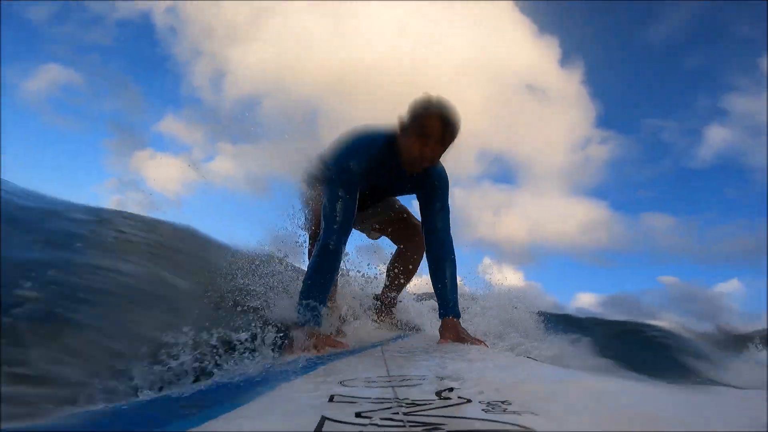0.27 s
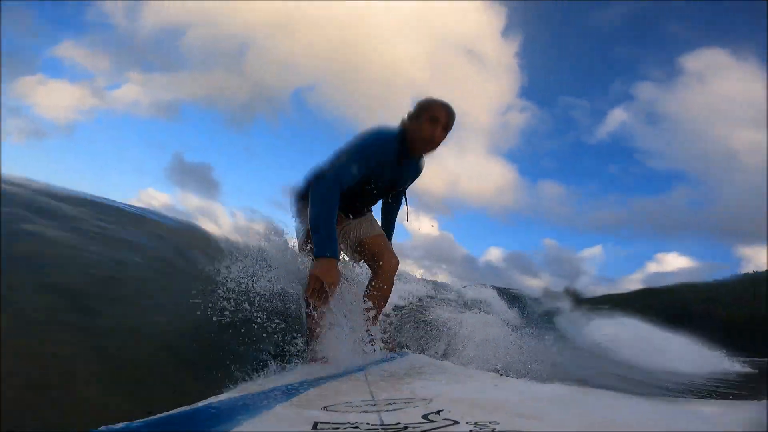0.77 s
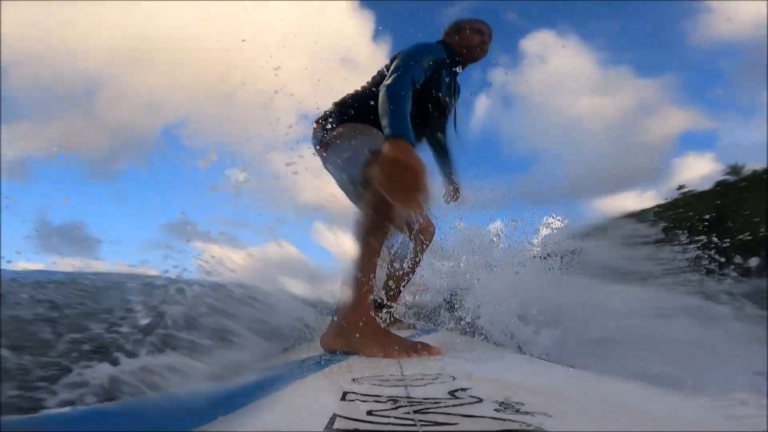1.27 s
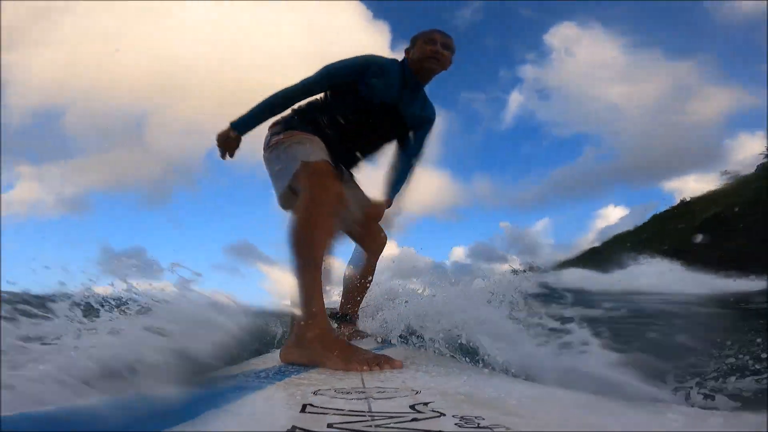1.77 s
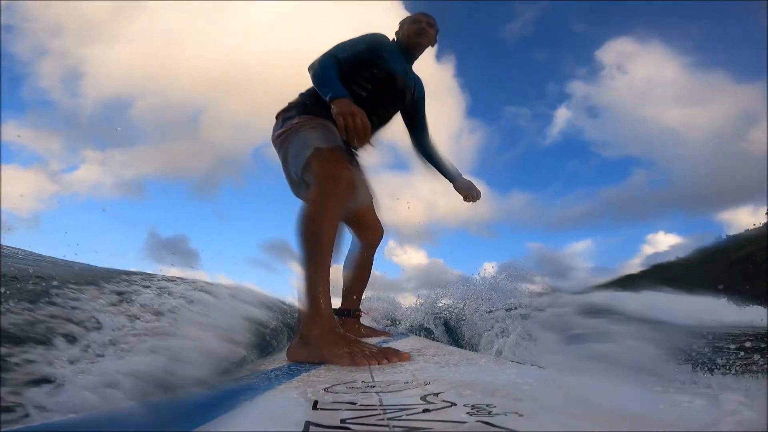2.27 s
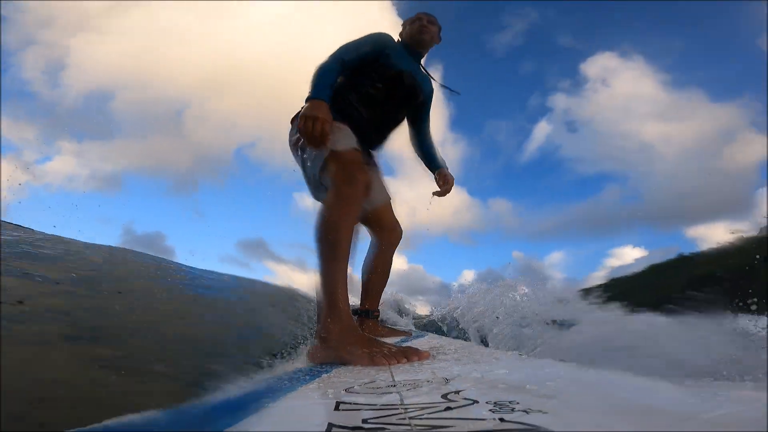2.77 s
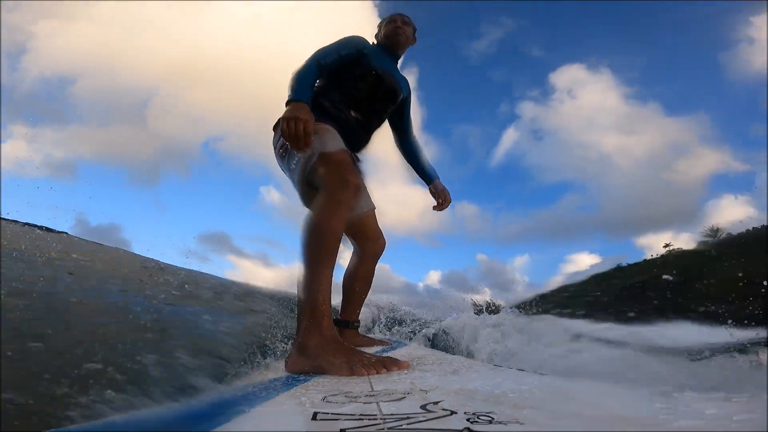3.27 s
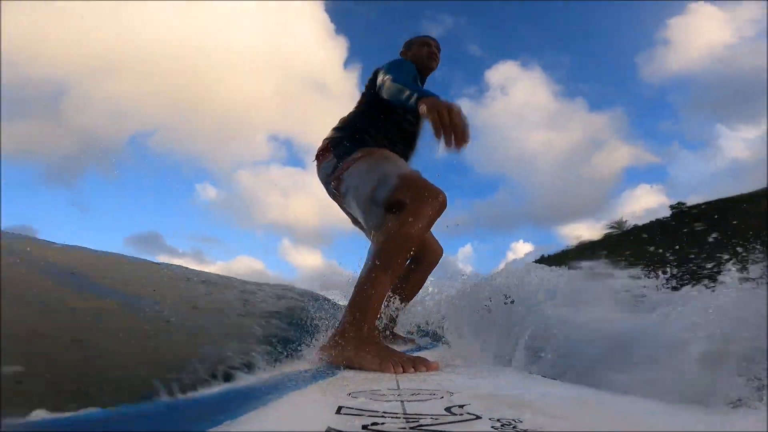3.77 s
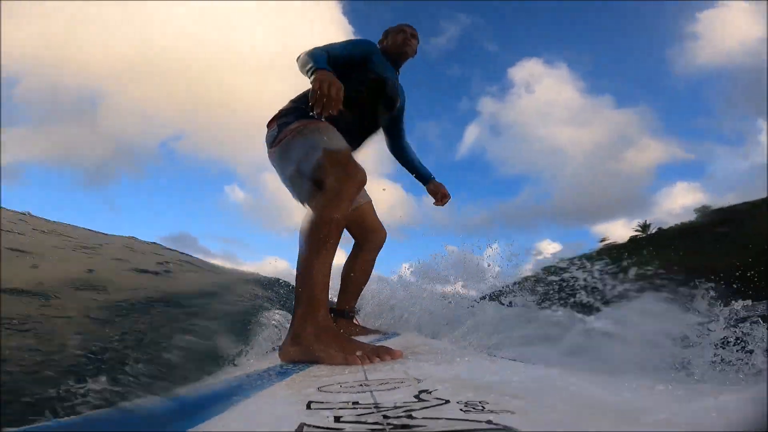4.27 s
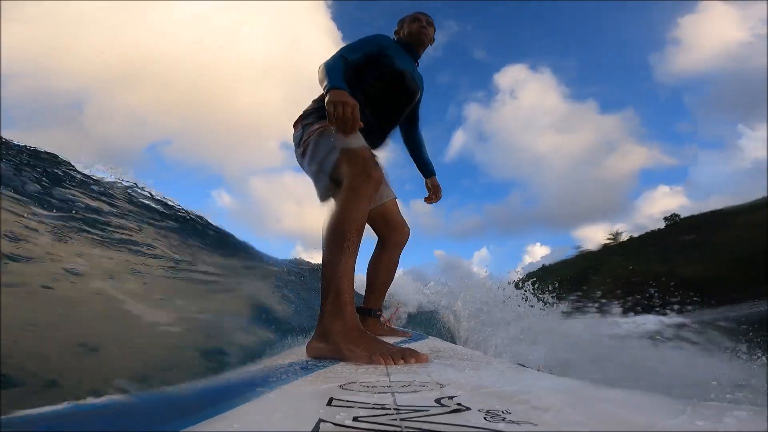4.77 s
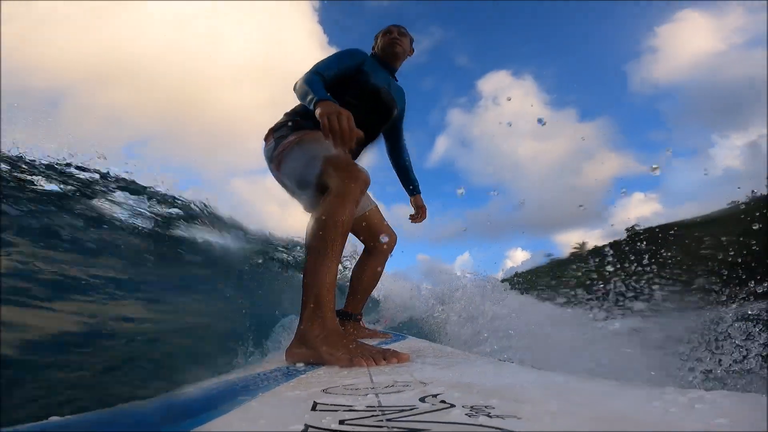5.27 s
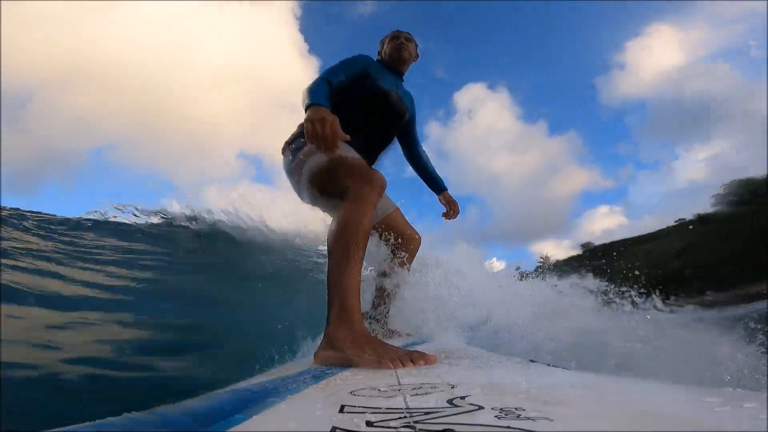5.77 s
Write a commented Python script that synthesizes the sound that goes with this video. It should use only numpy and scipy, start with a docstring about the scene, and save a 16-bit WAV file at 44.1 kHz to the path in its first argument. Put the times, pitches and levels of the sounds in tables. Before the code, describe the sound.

Water drums and slaps under a surfboard while whitewater rushes alongside, wind buffets the microphone and drops tick against it.

```python
"""Wind and chop buffet a sealed camera on the nose of a surfboard riding a breaking wave: a lumpy rumble.
Water thuds and drums on the hollow board, and trapped air pockets gulp beneath it.
Bursting foam rushes and hisses alongside, ducking when water washes over the microphone port.
A sheet of spray clatters on the case once, single drops tick now and then, and far surf hisses behind.
The wet case dulls the treble."""
import sys
import numpy as np
from scipy import signal
from scipy.fft import rfft, irfft, next_fast_len
from scipy.io import wavfile

SR = 44100
rng = np.random.default_rng(int(sys.argv[2]) if len(sys.argv) > 2 else 0)


def materialize(psi):
    """Save the field psi as 16-bit PCM at rate SR to the path in sys.argv[1].

    A 1-D psi becomes a single channel; in a 2-D psi each row is a channel.
    """
    bounded = np.clip(np.atleast_2d(psi).T, -1, 1)
    quanta = np.round(bounded * 32767).astype(np.int16)
    wavfile.write(sys.argv[1], SR, quanta)


N = 265040
RUN_IN = 8192   # samples for the resonances to settle

# Water under the hull: time_s, thud_db, drum_db, low_tilt_db_per_octave
HULL_WATER = [(0.0, -38.5, -32.5, -1), (0.32, -34.5, -37.5, -1.5), (0.52, -35, -40.5, -5.5),
              (0.7, -39, -39, -5.5), (1.27, -33.5, -38, 4.5), (1.5, -40.5, -37.5, 4.5),
              (1.76, -41, -35, 7.5), (1.89, -41.5, -42.5, -2.5), (2.09, -36.5, -38, 4),
              (2.2, -46, -31.5, 5), (2.39, -45.5, -28.5, 5.5), (2.6, -44.5, -32.5, 1),
              (2.88, -42, -38.5, -5), (3.18, -46.5, -33.5, 7.5), (4.03, -41.5, -35.5, -3),
              (4.54, -31.5, -32.5, 1.5), (4.67, -49.5, -40.5, -7), (4.87, -40, -37.5, -2.5),
              (5.15, -45, -43, 3), (5.39, -37.5, -33.5, 1.5), (5.57, -40.5, -30.5, 9.5),
              (6.01, -39, -38, -1)]
# Chop slaps the hull: centre_s, length_s, buffet_lift_db, thud_lift_db, drum_lift_db,
# low_tilt_db_per_octave
CHOP_SLAPS = [(.345, 0.035, 5.5, 9.5, 10.5, 1), (.465, 0.065, 7, 3, 7.5, -3.5),
              (1.24, 0.15, -1.5, 0, 12.5, 3), (1.33, 0.037, -6.5, -1, 3, -7),
              (1.399, 0.0096, 5, 13.5, 11, -5.5), (1.43, 0.037, 7.5, 6, -1, -1.5),
              (1.625, 0.047, 5, 6, -4, -0.5), (1.85, 0.13, 5.5, 5, 10.5, 1.5),
              (2.04, 0.091, 3.5, -17.5, 8, -4.5), (2.185, 0.049, 2.5, 3, 1, 7),
              (2.37, 0.06, 2.5, 7, -4.5, 0), (3.115, 0.17, -3, 8.5, 3.5, -5), (3.635, .06, 6, 8, 2.5, 3.2),
              (4.13, 0.058, -0.5, 9.5, -9, 4), (4.53, 0.012, -6, 1, 13, 0.5),
              (4.575, 0.028, 1, 10.5, 8.5, -2.5), (4.68, 0.054, -4.5, 18, 8, 1.5),
              (5.165, 0.091, -2.5, 11.5, 7, -2.5), (5.75, 0.03, 0, -4, 8, 1)]
# Tone of spray hiss, near and far: frequency_hz, level_db
SPRAY_SPECTRUM = [(1500, -11), (2100, -8.5), (2600, 2), (3000, -4), (3400, -8), (3900, -13.5),
                  (4600, -15.5), (5400, -21.5), (6400, -30), (7500, -40.5), (10000, -66)]


def buffet():
    """Eddies of wind and chop shake the case: lumpy low noise."""
    # Tone of the rumble: frequency_hz, level_db
    spectrum = [(12, -41.5), (20, -2.5), (54, -0.5), (125, -9.5), (160, -25), (280, -120)]
    # Level of the low rumble, with its random lumps and dips: time_s, level_db
    rumble_levels = [(0.0, -25.5), (0.13, -31.5), (0.33, -30), (0.55, -31.5), (0.8, -30), (1.0, -33.5),
                     (1.17, -35), (1.22, -25.5), (1.66, -40), (2.44, -26.5), (2.59, -35), (2.71, -27),
                     (3.06, -31), (3.1, -36), (3.18, -24.5), (3.85, -34.5), (3.95, -28.5), (4.0, -38.5),
                     (4.03, -31), (4.5, -32), (4.63, -22.5), (4.7, -18.5), (4.74, -41), (4.85, -29),
                     (5.04, -34), (5.15, -24.5), (5.46, -37.5), (5.61, -26.5), (5.89, -34), (6.01, -32)]
    level_db, = curves(rumble_levels)
    lift_db, _, _, _ = swells(CHOP_SLAPS)
    eddies = rng.standard_normal(N) * from_db(1.1 * drift(3.5))
    return from_db(level_db + lift_db) * coloured(eddies, spectrum)


def thuds():
    """Chop knocks the board from below and shakes its lowest, well damped bending mode."""
    pitch_hz, width_hz = 157.8, 90
    level_db, _, _ = curves(HULL_WATER)
    _, lift_db, _, _ = swells(CHOP_SLAPS)
    chop = rng.standard_normal(RUN_IN + N)
    bending = resonance(resonance(chop, pitch_hz, width_hz), pitch_hz, 2 * width_hz)[RUN_IN:]
    return from_db(level_db + lift_db) * damped(bending)


def drumming(surge_db):
    """Water drums on the hollow board; each mode swells and fades by itself."""
    # The board's drum modes: pitch_hz, width_hz, level_db
    modes = [(245.3, 77, -3.5), (336.3, 78, 0.5), (383, 71.6, 1.5), (479.5, 150, -7.5)]
    _, level_db, tilt = curves(HULL_WATER)
    _, _, lift_db, slap_tilt = swells(CHOP_SLAPS)
    water = rng.standard_normal(RUN_IN + N)
    water[RUN_IN:] += 0.46 * grains(300, spread_db=5.0)
    out = 0
    for k, (hz, width_hz, db) in enumerate(modes):
        mode = resonance(resonance(water, hz, width_hz), hz, 3.6 * width_hz)[RUN_IN:]
        lean_db = (tilt + slap_tilt) * np.log2(330 / hz)
        out += (-1) ** k * mode * from_db(db + lean_db + 0.16 * surge_db + 0.81 * drift(3.2))
    return from_db(level_db + lift_db) * damped(out)


def gulps():
    """Air pockets ring under the hull: each a sine that swells and fades, nearly all gliding upward."""
    # Trapped air: centre_s, length_s, peak_db, pitch_hz (half a length before the centre),
    # later_pitch_hz (half a length after it)
    pockets = [(.352, .025, -21, 218, 286), (0.473, 0.028, -24.5, 322, 343),
               (1.627, 0.018, -20.5, 250, 269), (1.828, 0.049, -28.5, 246, 263),
               (2.189, 0.042, -27, 235, 272), (2.291, 0.12, -33, 234, 289), (2.372, 0.097, -30.5, 292, 325),
               (2.422, 0.05, -28, 259, 253), (2.478, 0.069, -28.5, 245, 268), (2.63, 0.033, -29, 300, 312),
               (3.123, .05, -24, 295, 297)]
    out, t = np.zeros(N), np.arange(N) / SR
    for (centre_s, length_s, db, hz, later_hz), phase in zip(pockets, rng.random(len(pockets))):
        along = (t - centre_s) / length_s
        cycles = phase + length_s * ((hz + later_hz) * along + (later_hz - hz) * along ** 2) / 2
        out += from_db(db) * np.exp(-(2 * along) ** 2) * np.sin(2 * np.pi * cycles)
    return out


def breaking_wave(surge_db):
    """Whitewater rushes and spray hisses alongside; splashes lift both and darken the hiss as it rises."""
    # Tone of the rush: frequency_hz, level_db
    rush_spectrum = [(300, -12.5), (520, -0.5), (700, 0), (850, 1), (1000, 0), (1300, -5), (1700, -11),
                     (2100, -20.5), (2600, -44.5)]
    # The wave's course: time_s, rush_db, hiss_db, hiss_brightness_db_per_octave
    course = [(0.0, -41, -54.5, 3), (0.08, -38.5, -60, -5), (0.17, -36.5, -56, -1), (0.3, -38, -55.5, -4.5),
              (0.37, -41.5, -66, 0), (0.5, -37, -56, -2.5), (0.69, -41, -60.5, -3), (1.29, -40.5, -59, 0.2),
              (1.61, -38.5, -63, -4.5), (2.07, -37.5, -70.5, -8.5), (2.29, -38, -65.5, -1.5),
              (2.49, -36.5, -61, -1), (2.83, -44.5, -67, 3), (3.05, -43.5, -65.5, 0), (3.15, -42, -62.5, 3),
              (3.27, -41.5, -59.5, 3.5), (3.55, -40, -64, 0), (3.85, -40.5, -59, 1.5),
              (4.2, -41, -60.5, 3.5), (4.37, -37.5, -55, -1), (4.54, -38.5, -61, 0.3),
              (4.72, -45, -63.5, 1.5), (4.95, -43.5, -65.5, 3), (5.32, -43.5, -64.5, 1.5),
              (5.5, -35, -57.5, 0), (5.58, -38, -56, -1), (5.7, -35.5, -56, 0), (5.78, -35.5, -55.5, -0.5),
              (5.87, -34.5, -55.5, 0.5), (6.01, -35, -54.5, -0.5)]
    # Splashes near the camera: centre_s, length_s, rush_lift_db, hiss_lift_db
    splashes = [(.29, 0.034, 3.5, 0.5), (.32, 0.032, 10, 3.5), (.455, 0.031, 8.5, 4), (1.23, .08, 5.5, -4),
                (1.4, .012, 2, 2), (1.43, 0.037, 1, 8), (2.14, 0.081, 3.5, 2.5), (2.25, 0.045, 2.5, 4),
                (2.35, .06, 1.5, 4.5), (2.55, .04, 0.5, 1.5), (3.12, 0.099, 8.5, 9), (3.285, 0.05, 5, 6.5),
                (3.93, 0.04, 3.5, 8.5), (4.125, 0.12, 3.5, 3), (4.18, 0.043, -0.5, 4),
                (4.47, 0.035, 2.5, 4), (4.525, 0.017, 6, 4), (4.565, 0.018, 7, 5.5), (4.65, .02, 3, 2.5),
                (4.725, 0.038, 10.5, 10), (5.52, 0.059, 3, 4.5)]
    rush_db, hiss_db, brightness = curves(course)
    rush_lift_db, hiss_lift_db = swells(splashes)
    rush = foam(rush_spectrum, 280 * 2 ** np.arange(0, 3.6, .5), surge_db, .5 * brightness,
                pops_per_s=2300, crackle=0.33, flicker_db=1.5, flicker_ratio=1.0)
    hiss = foam(SPRAY_SPECTRUM, 1400 * 2 ** np.arange(0, 3.1, .5), surge_db,
                brightness - 0.78 * hiss_lift_db,
                pops_per_s=3900, crackle=0.32, flicker_db=2.5, flicker_ratio=0.87)
    return from_db(rush_db + rush_lift_db) * rush + from_db(hiss_db + hiss_lift_db) * hiss


def foam(spectrum, bands_hz, surge_db, brightness, pops_per_s, crackle, flicker_db, flicker_ratio):
    """Bursting foam: pops on noise, in flickering half-octaves; a ratio under 1 calms the upper bands."""
    bursts = rng.standard_normal(N) + crackle * grains(pops_per_s, spread_db=7.0)
    size = next_fast_len(N)
    bins, octaves, out = rfft(bursts, size), np.log2(bin_hz(size)), 0
    for k, hz in enumerate(bands_hz):
        window = np.cos(np.pi * np.clip(octaves - np.log2(hz), -.5, .5)) ** 2
        lean_db = brightness * np.log2(hz / bands_hz[2])
        motion_db = flicker_ratio ** k * (surge_db + flicker_db * drift(34.0))
        out += irfft(bins * window, size)[:N] * from_db(lean_db + motion_db)
    return coloured(out, spectrum)


def port_wash(attack_s=0.019):
    """Gain that dips as water quickly closes the microphone port, then drains away."""
    # Water over the port: start_s, loss_db, drain_s
    washes = [(0.349, 8, 0.2), (.485, 3.5, .05), (4.585, 6, 0.029)]
    start_s, loss_db, drain_s = np.transpose(washes)
    since_s = np.maximum(np.arange(N)[:, None] / SR - start_s, 0)
    cover = np.minimum(since_s / attack_s, 1) * np.exp(-(since_s / drain_s) ** 2)
    return from_db(-cover @ loss_db)


def spray_sheet(start_s=1.19, rise_s=.025, hold_s=.095, fall_s=.025, bed_db=-58):
    """Thrown water lands on the case as a quick clatter of droplets, in gushes."""
    # Tone of the clatter: frequency_hz, level_db
    spectrum = [(500, -9), (1200, 5), (2600, 5.5), (4000, -7.5), (6500, -17.5), (8000, -44.5), (11000, -45),
                (13000, -59)]
    # Gushes within the sheet: centre_s, level_db, length_s
    gushes = [(1.207, -43, 0.0055), (1.215, -39, 0.0047), (1.222, -33.5, 0.0084), (1.23, -43, 0.0033),
              (1.236, -39, 0.0041), (1.254, -38.5, 0.0051), (1.265, -37, 0.0052), (1.275, -40, .004),
              (1.284, -33.5, 0.0072), (1.298, -42, 0.0033), (1.308, -46, 0.0067), (1.325, -53, .012)]
    t = np.arange(N) / SR
    corners_s = start_s + np.cumsum([0, rise_s, hold_s, fall_s])
    level = from_db(bed_db) * np.interp(t, corners_s, [0, 1, 1, 0])
    for centre_s, db, length_s in gushes:
        level += from_db(db) * np.exp(-2 * np.abs(t - centre_s) / length_s)
    clatter = rng.standard_normal(N) * from_db(1.2 * drift(120.0))
    return level * coloured(clatter, spectrum)


def drops():
    """Each drop rings for a millisecond or two at its own pitch, some with a sharp crack."""
    # Drops on the case: start_s, level_db, pitch_hz, crack_gain
    hits = [(0.148, -43, 3300, 0.1), (0.149, -50, 5200, 0), (0.316, -42, 3000, 0), (0.319, -32, 2600, 0.04),
            (0.3205, -39, 3900, 0), (0.321, -55, 5600, 0.1), (0.342, -54, 5500, .3), (0.5955, -43, 4400, 0),
            (0.608, -37.5, 4500, 0.06), (0.6085, -59, 6800, 0), (1.2148, -52, 2680, 0.5),
            (1.2205, -44, 2660, 0.1), (1.229, -42, 5500, .2), (1.236, -44, 3220, 0.9),
            (1.2517, -33.5, 6470, 0.1), (1.265, -51, 4200, .9), (1.268, -33, 2100, 0),
            (1.281, -42, 6200, .3), (1.2845, -41, 4800, 0.1), (1.292, -44, 3350, 0.6),
            (1.3068, -32, 4150, 0.1), (1.3145, -42, 5200, .1), (1.319, -48, 7300, 0.1),
            (1.3245, -45, 5200, 0.1), (1.3635, -52, 6300, 0.1), (1.364, -50, 4600, 0),
            (1.523, -29.5, 2790, 0), (3.924, -39, 2650, 0), (3.943, -49, 4400, 0.03), (3.097, -50, 4400, 0),
            (3.252, -48, 4700, 0), (3.266, -49, 4500, 0), (3.283, -51, 4600, 0), (3.305, -42, 3150, 0),
            (4.119, -34, 2600, 0), (4.142, -43, 2700, 0.05), (4.519, -27.5, 2720, 0.01),
            (5.41, -47, 4500, 0), (5.582, -46, 4400, 0)]
    out, t = np.zeros(N), np.arange(400) / SR
    for start_s, db, hz, crack_gain in hits:
        at = round(start_s * SR)
        ring = np.sin(2 * np.pi * hz * t) * np.exp(-t / .0009) * (1 - np.exp(-t / .0004)) ** 3
        crack = rng.standard_normal(len(t)) * np.exp(-t / 0.0029) * (1 - np.exp(-t / .0001))
        out[at:at + len(t)] += from_db(db) * (ring + crack_gain * crack)
    return signal.sosfilt(signal.butter(4, 7000, fs=SR, output="sos"), out)   # the case dulls the tick


def far_surf(level_db=-68):
    """Distant breaking water: a smooth hiss that stays when the near spray pauses."""
    return from_db(level_db) * coloured(rng.standard_normal(N), SPRAY_SPECTRUM)


def from_db(db):
    """Gain of a level."""
    return 10 ** (np.asarray(db) / 20)


def unit_rms(x):
    """Scaled to rms 1."""
    return x / np.sqrt(np.mean(x ** 2) + 1e-20)


def curves(rows):
    """Straight ramps between timed points, one curve a column."""
    time_s, *columns = np.transpose(rows)
    return [np.interp(np.arange(N) / SR, time_s, column) for column in columns]


def swells(rows):
    """Bell-shaped swells, one curve for each column after centre and length."""
    centre_s, length_s, *columns = np.transpose(rows)
    bells = np.exp(-(2 * (np.arange(N)[:, None] / SR - centre_s) / length_s) ** 2)
    return [bells @ column for column in columns]


def drift(rate_hz):
    """Smooth random wander of rms 1, drawn at every 40th sample."""
    pole = np.exp(-80 * np.pi * rate_hz / SR)
    slow = signal.lfilter([1], [1, -2 * pole, pole * pole], rng.standard_normal(N // 40 + 2002))[2000:]
    return np.interp(np.arange(N) / 40, np.arange(len(slow)), unit_rms(slow))


def grains(per_s, spread_db):
    """Random clicks of very uneven size and either sign."""
    sizes = from_db(spread_db * np.minimum(rng.exponential(1, N), 5)) * rng.choice([-1, 1], N)
    return unit_rms(sizes * (rng.random(N) < per_s / SR))


def bin_hz(size):
    """Frequencies of the FFT bins, at least 1 Hz."""
    return np.maximum(np.arange(size // 2 + 1) * SR / size, 1)


def coloured(x, spectrum):
    """Noise shaped by an EQ curve; rms 1."""
    hz, db = np.transpose(spectrum)
    size = next_fast_len(N)
    eq_db = np.interp(np.log(bin_hz(size)), np.log(hz), db, -120, -120)
    return unit_rms(irfft(rfft(x, size) * from_db(eq_db), size)[:N])


def resonance(x, hz, width_hz):
    """Two-pole resonance with gain 1 at its peak."""
    r = np.exp(-np.pi * width_hz / SR)
    gain = (1 - r * r) / 2
    return signal.lfilter([gain, 0, -gain], [1, -2 * r * np.cos(2 * np.pi * hz / SR), r * r], x)


def damped(x):
    """Foam core and water soak up the board's treble; rms 1."""
    return unit_rms(signal.sosfilt(signal.butter(2, 1200, fs=SR, output="sos"), x))


def scene():
    """All sources at one microphone; one surge of water drives drumming, whitewater and spray together."""
    surge_db = 1.2 * drift(42.0)
    wave = port_wash() * breaking_wave(surge_db)
    hull = thuds() + drumming(surge_db)
    surf = far_surf()
    return (buffet() + hull + gulps() + wave + spray_sheet() + drops() + surf)[None]


def record(dry):
    """Peaks are rounded, a faint, steady white hiss is added, the top is cut."""
    ceiling, hiss_db, cutoff_hz = .3, -101, 13500
    hiss = from_db(hiss_db) * rng.standard_normal(dry.shape)
    rounded = ceiling * np.tanh(dry / ceiling)
    return signal.sosfilt(signal.cheby2(10, 40, cutoff_hz, fs=SR, output="sos"), rounded + hiss)


dry = scene()
out = record(dry)
materialize(out)
```